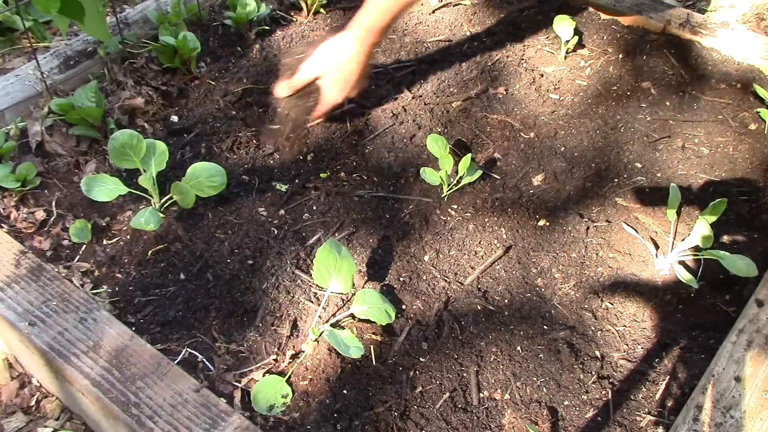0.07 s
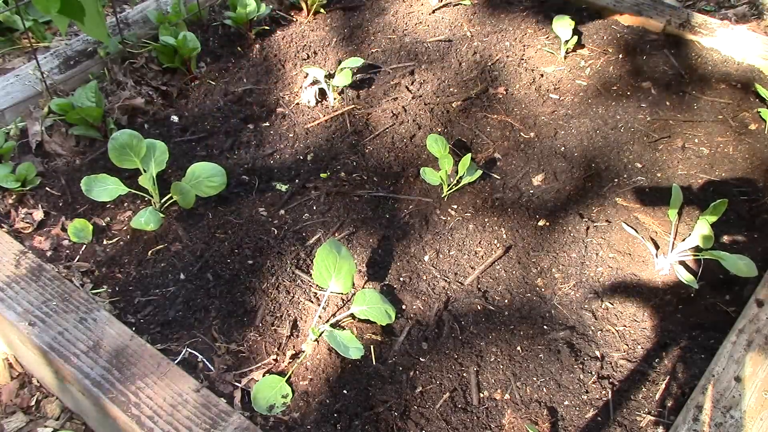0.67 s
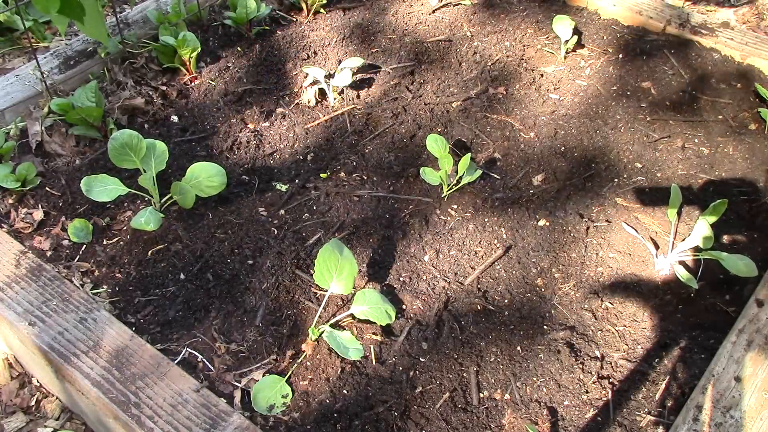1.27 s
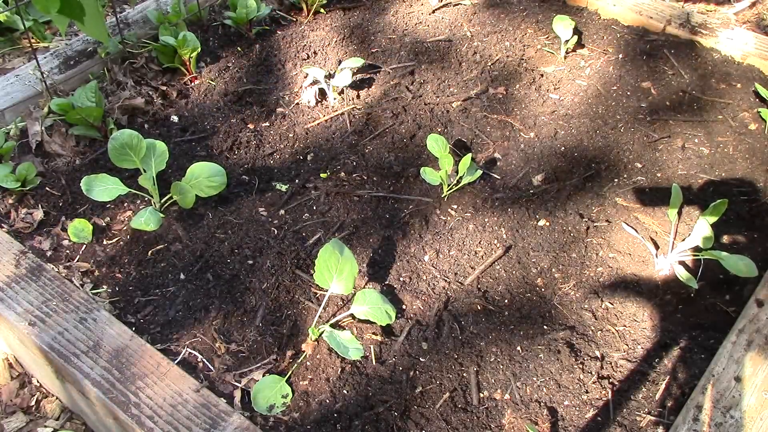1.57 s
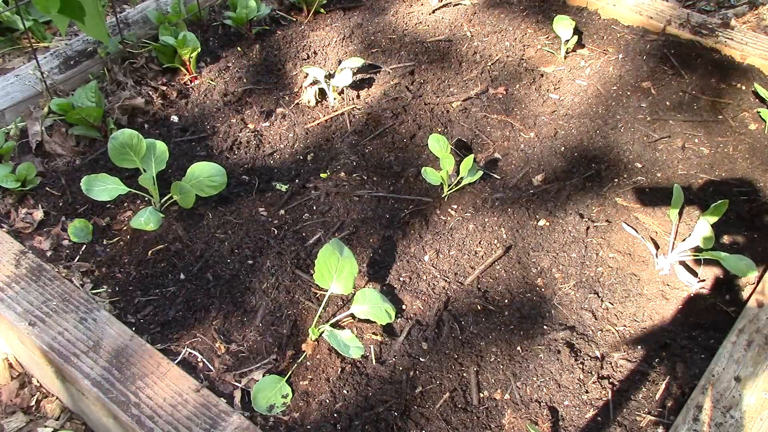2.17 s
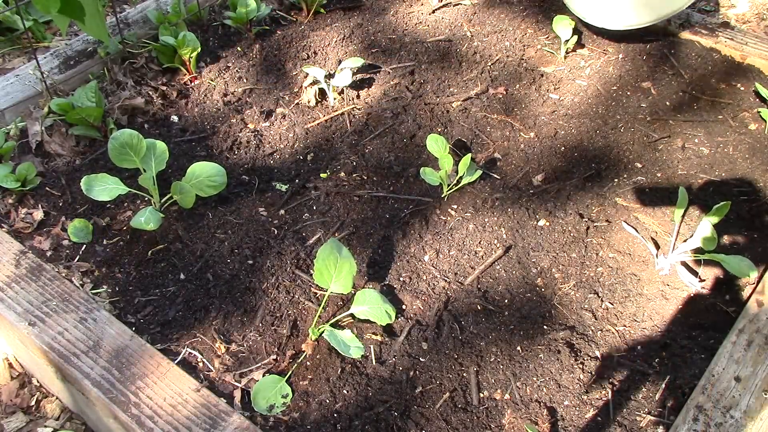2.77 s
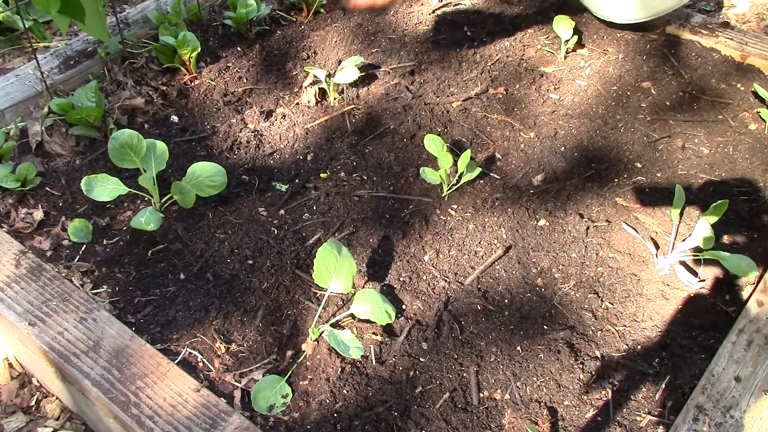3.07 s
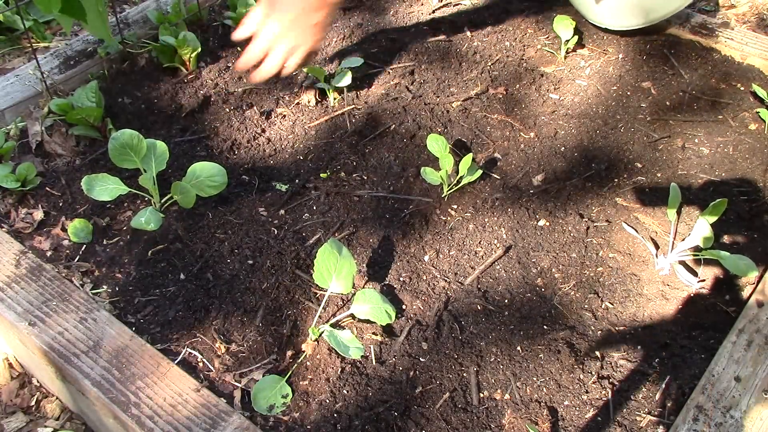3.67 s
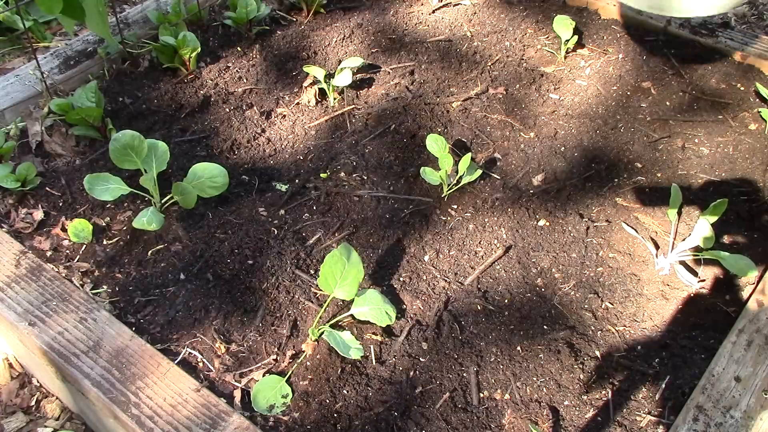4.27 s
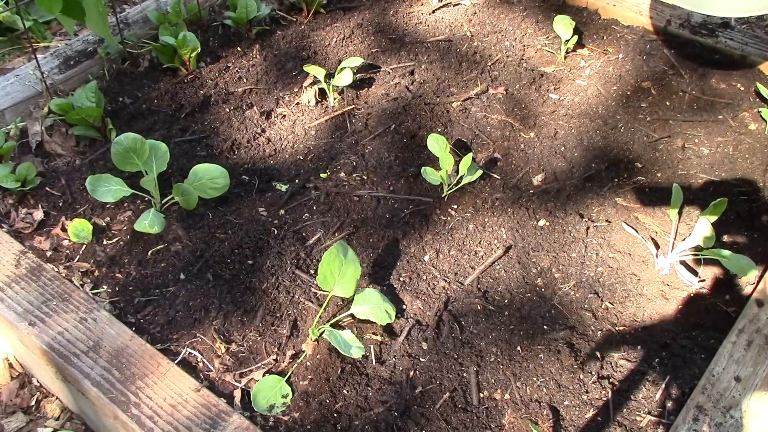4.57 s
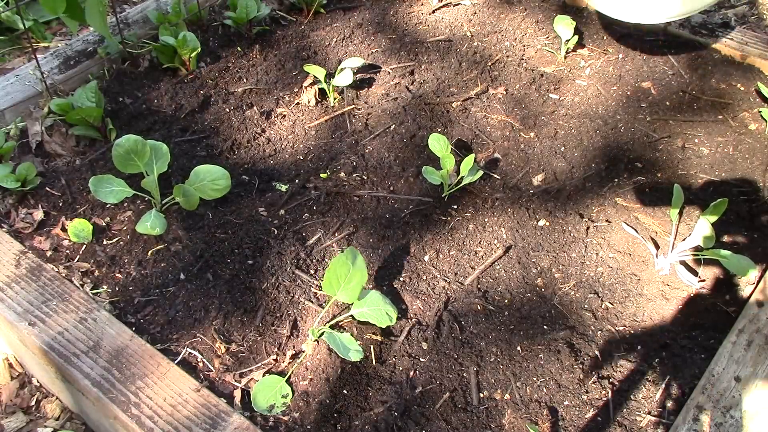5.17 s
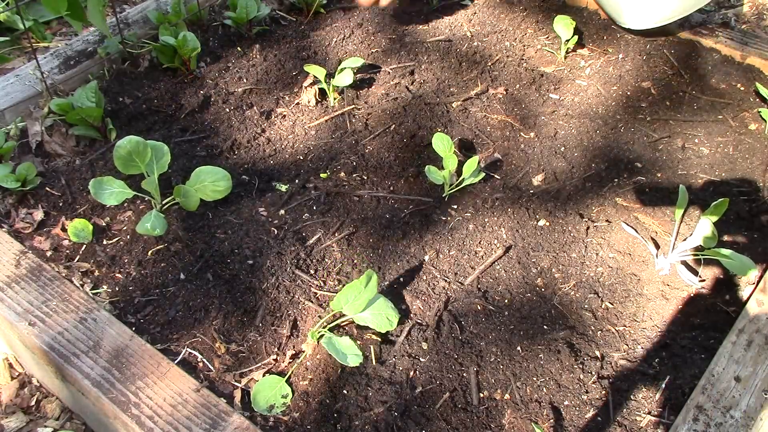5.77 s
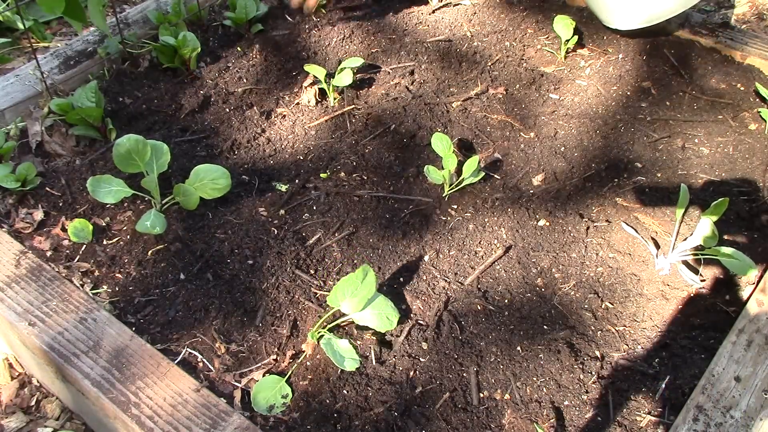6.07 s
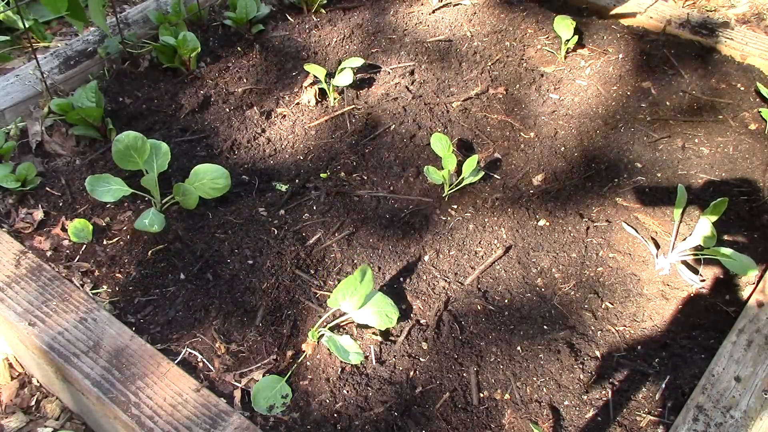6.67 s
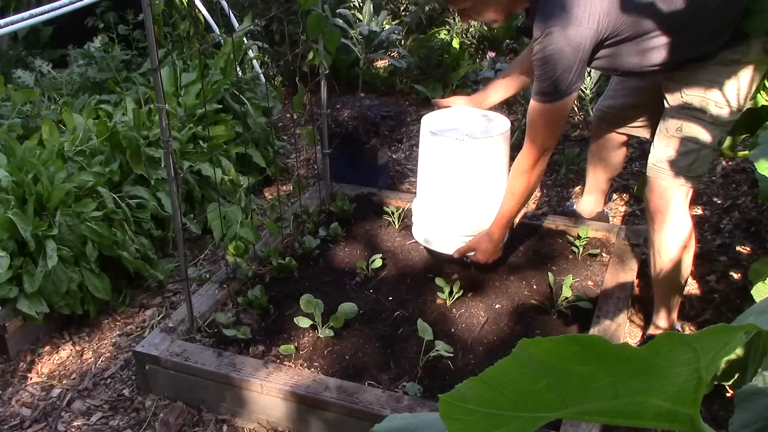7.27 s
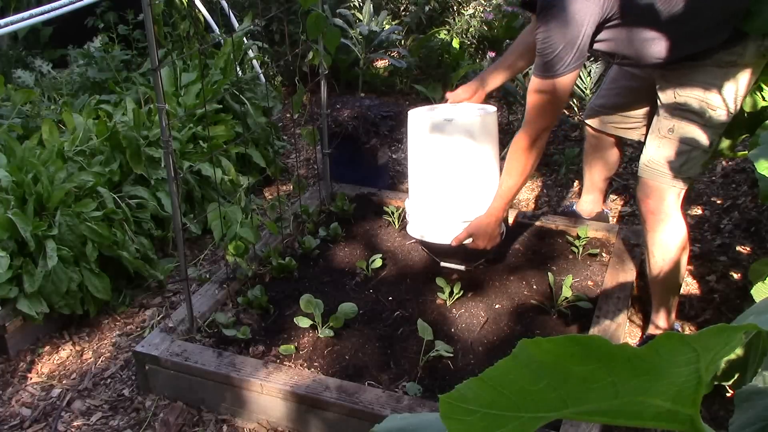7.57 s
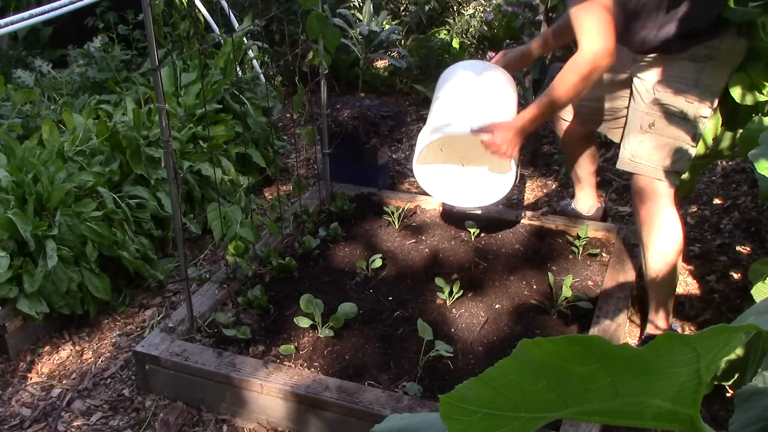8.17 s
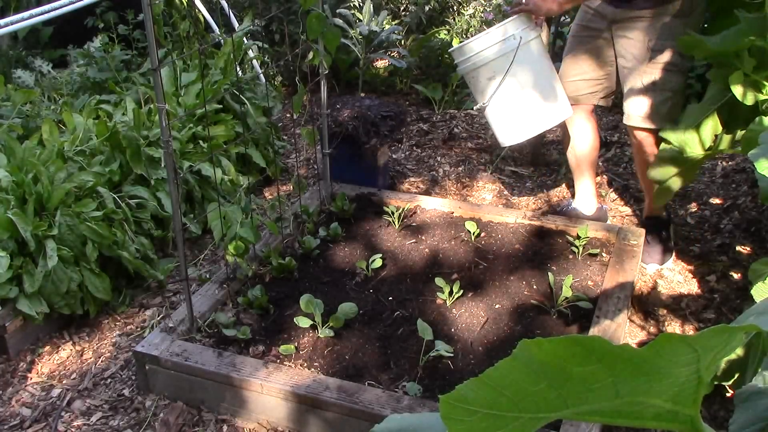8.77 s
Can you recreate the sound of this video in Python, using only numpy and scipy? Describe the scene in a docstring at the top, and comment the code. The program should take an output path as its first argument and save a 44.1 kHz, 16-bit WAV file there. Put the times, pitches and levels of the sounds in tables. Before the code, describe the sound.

Compost scraped from a plastic bucket by hand, with hollow knocks and a distant engine, then three booming slaps and a clattering wire handle.

```python
"""A distant engine hums, changes gear and fades while a hand digs compost from a plastic bucket, knocking
its wall into resonance. Crumbs scrape and hiss, twigs snap, and handfuls patter on a garden bed. From about
2.5 s, soft rubs, bumps and puffs of air reach the microphone. At 7.4 s the upturned bucket takes the first
of three booming slaps; then it is carried off, its wire handle clattering on the rim."""
import sys
import numpy as np
from scipy import signal
from scipy.fft import rfft, irfft, next_fast_len
from scipy.io import wavfile

SR = 44100
rng = np.random.default_rng(int(sys.argv[2]) if len(sys.argv) > 2 else 0)


def bounce(signal):
    """Save signal as a 16-bit WAV file at the path given by the first command-line argument."""
    frames = np.transpose(np.atleast_2d(signal))
    limited = np.clip(frames, -1, 1)
    pcm = np.round(limited * 32767).astype(np.int16)
    wavfile.write(sys.argv[1], SR, pcm)


N = 398223

# modes of the bucket's hollow and of its wire handle: (frequency [Hz], relative level [dB], t60 [s])
HOLLOW_MODES = [(127.2, -35, 0.8), (235, -36.5, 1), (784.8, -19, 0.37), (980, -28, 0.19), (1310, -28, 0.41),
                (1712, -46, 0.28), (2340, -37, 0.43)]
WIRE_MODES = [(2810, -43, 0.3), (3065, -23, 0.36), (3170, -20.5, 0.26)]
# body and bright top of a twig or grit snap: (frequency [Hz], relative level [dB])
SNAP_BODY_SPECTRUM = [(300, -32), (900, 1.5), (1600, 9), (3000, 11), (4000, 6), (5300, 6), (7000, 0.5),
                      (16000, -9)]
SNAP_TOP_SPECTRUM = [(2500, -56), (5300, 12), (7000, 3), (8700, 5), (12000, 1.5), (16000, -12)]


def scuffs(loaded_db=-7, emptied_s=6.2, thud_db=-21.5, thud_per_dull=1.66, crack_db=-11):
    """The digging hand knocks on the wall; compost damps the ring until the bucket is nearly empty."""
    # (time [s], level [dB], dullness: wall tone relative to the level [dB], t60 [s], drag [s])
    touches = [(0.836, -22.5, -1.5, .25, 0.002), (0.854, -23.5, -3.5, 0.21, 0.0099),
               (0.874, -32.5, 9, 0.092, 0.0049), (0.923, -40, 15, .1, 0.0007), (1.143, -22, -2, 0.26, .007),
               (1.309, -23.5, 6, 0.25, 0.0062), (1.341, -31, 4, 0.18, .004),
               (1.42, -24.5, -3, 0.092, 0.00082), (1.483, -14, -8, 0.053, 0.00077),
               (1.5, -9, -9, 0.18, .005), (1.516, -20, 3, 0.094, 0.0014), (1.53, -23, 1.5, 0.06, 0.0013),
               (1.603, -27, -2.5, 0.026, 0.00052), (1.677, -31.5, -6, 0.035, .001),
               (1.706, -32.5, 4.5, .08, 0.00054), (1.769, -25, -4.5, 0.032, .0006),
               (1.82, -17, -5.5, .07, .007), (1.829, -12.5, -7, 0.082, 0.0029),
               (1.841, -14.5, 0.5, 0.2, 0.0023), (1.865, -24.5, 5.5, 0.066, .004),
               (1.907, -20, 6, .1, 0.0016), (1.949, -21.5, 2.5, 0.047, 0.0013),
               (2.025, -32, 8.5, .18, .001), (2.43, -36, 0.5, 0.15, 0.00063),
               (2.589, -26, -5.5, 0.032, 0.0024), (4.235, -33.5, -5, 0.1, 0.0008),
               (4.365, -23, -8.5, 0.16, .001), (4.387, -20, -12, .07, 0.0017),
               (4.399, -20, -10, 0.031, 0.00047), (4.432, -14.5, -9, 0.022, .0025),
               (5.018, -34.5, -1.5, .2, .001), (6.494, -22, -6.5, 0.22, 0.0045),
               (6.512, -21, -7, 0.092, 0.0038), (6.647, -32, -6.5, 0.1, 0.00071),
               (7.088, -45, 6.5, 0.065, .004)]
    hits = [(s, db, thud_db + thud_per_dull * dull, dull, crack_db, t60, drag_s)
            for s, db, dull, t60, drag_s in touches]
    damped = [(s, db + loaded_db * (s < emptied_s)) for s, db, *_ in touches]
    wall = knocks(hits, chatter_db=-3.5)
    return wall + ringing(damped, HOLLOW_MODES, ring_db=0.5) + ringing(damped, WIRE_MODES, ring_db=3)


def slaps(wall_db=-5, crack_db=-4, t60=0.1, drag_s=0.0027):
    """A flat hand on the upturned bucket: the bottom booms like a drum under the thud and crack."""
    # (time [s], level [dB], relative thud [dB], relative boom [dB])
    blows = [(7.36, -13, -8, -7.5), (7.623, -13.5, -5.5, -0.5), (7.912, -16.5, -1, -1.5)]
    # the drumming bottom: (frequency [Hz], relative level [dB], t60 [s])
    bottom_modes = [(121, -27, 0.32), (222, -5, 0.23), (292, -17, 0.42), (371, -4, 0.074)]
    hits = [(s, db, thud_db, wall_db, crack_db, t60, drag_s) for s, db, thud_db, _ in blows]
    boom = ringing([(s, db + boom_db) for s, db, _, boom_db in blows], bottom_modes, ring_db=-6)
    rings = ringing(hits, HOLLOW_MODES, ring_db=-3) + ringing(hits, WIRE_MODES, ring_db=-2.5)
    return knocks(hits, chatter_db=-2.5) + boom + rings + ticks(hits, tick_db=-10, t60=0.072)


def clatter(thud_db=-22, wall_db=-7, t60=0.16):
    """The wire handle falls against the empty bucket's rim: light, bright and ringing."""
    # (time [s], level [dB], relative crack [dB], drag [s])
    rim_taps = [(7.399, -30, -11, .001), (7.42, -36, -14, 0.0049), (7.585, -41.5, -14, 0.00093),
                (7.638, -25.5, -12, 0.0012), (7.68, -36, -12, 0.0057), (8.009, -44, -12, 0.0097),
                (8.111, -48.5, -13, 0.0052), (8.268, -30, -14, 0.0036), (8.316, -31, -9.5, 0.0013),
                (8.338, -36, -14, .001), (8.65, -17, -3, 0.0056), (8.669, -18, -7, 0.0032),
                (8.9, -37, -8, 0.0049)]
    hits = [(s, db, thud_db, wall_db, crack_db, t60, drag_s) for s, db, crack_db, drag_s in rim_taps]
    cracks = [(s, db + crack_db) for s, db, crack_db, _ in rim_taps]
    rings = ringing(hits, HOLLOW_MODES, ring_db=3.5) + ringing(hits, WIRE_MODES, ring_db=1.5)
    return knocks(hits, chatter_db=-2) + rings + ticks(cracks, tick_db=-3, t60=0.037)


def handle_ping(s=8.714, hz=5800, db=-31, t60=0.066):
    """The wire handle rings briefly as it swings free."""
    out, t = np.zeros(N), np.arange(SR // 4) / SR
    add(out, s, np.sin(2 * np.pi * hz * t) * from_db(db - 60 * t / t60))
    return out


def knocks(hits, chatter_db, crack_t60=0.023, size=7000):
    """Each contact with the bucket drags, peaks and dies in a chatter, balanced in four bands."""
    # tone of the contact force: (frequency [Hz], relative level [dB])
    contact_spectrum = [(100, -15), (400, -2), (1500, 4.5), (3300, 5.5), (4200, -3), (6000, -7),
                        (8000, -10), (12000, -18.5), (16000, -44)]
    out, t = np.zeros(N), np.arange(size) / SR
    attack = SR // 100   # the first 10 ms set each band's level
    bands_hz = [(150, 650), (650, 1200), (1200, 3600), (3600, 15800)]
    for s, db, thud_db, wall_db, crack_db, t60, drag_s in hits:
        pressing = np.sqrt(np.minimum(t / max(drag_s, 1 / SR), 1))
        since_peak = np.maximum(t - drag_s, 0)
        decay = from_db(-60 * since_peak / crack_t60) + from_db(chatter_db - 60 * since_peak / t60)
        force = rng.standard_normal(size) * pressing * decay
        shell = bucket(colour(force, contact_spectrum), direct=0.2)
        for edges_hz, share_db in zip(bands_hz, (thud_db, wall_db, 0, crack_db)):
            part = band(shell, *edges_hz, order=3)
            add(out, s, part * from_db(db + share_db) / np.std(part[:attack]))
    return out


def bucket(x, direct, flex=0.024, touch_db=3.0):
    """The plastic shell resonates beside the direct sound; each grip shifts its tuning and balance."""
    # (frequency [Hz], width [Hz], gain [dB])
    shell_modes = [(214, 67, 2), (323, 11, -16), (474.5, 39, 7.5), (695, 34, -10.5), (938, 63, 4.5),
                   (1050, 13, 0), (1264, 18, -1.5), (1479, 126, -1.5), (1670, 176, -0.5), (2173, 300, -2),
                   (2366, 16, -4.5), (2665, 350, -5), (3056, 47, -6.5), (3310, 52, -15), (4450, 87, -5),
                   (4420, 290, -14), (5420, 220, -7), (6860, 320, -16)]
    out = direct * x
    for hz, width_hz, db in shell_modes:
        bend, touch = rng.standard_normal(2)
        out = out + from_db(db + touch_db * touch) * resonance(x, hz * (1 + flex * bend), width_hz)
    return out


def ringing(hits, modes, ring_db, touch_db=2):
    """Hits (time [s], level [dB], ...) set modes ringing, in a slightly different balance each time."""
    out, t = np.zeros(N), np.arange(SR // 2) / SR
    hz, mode_db, t60 = np.transpose(modes)[:, :, None]
    rings = np.sin(2 * np.pi * hz * t) * from_db(mode_db - 60 * t / t60)
    rings = band(rings, 0.85 * hz.min(), 2 * hz.max(), order=3)
    for s, db, *_ in hits:
        mode_gains = from_db(db + ring_db + touch_db * rng.standard_normal(len(modes)))
        add(out, s, mode_gains @ rings)
    return out


def ticks(hits, tick_db, t60, size=2048):
    """A burst of treble noise puts a bright edge on hard hits (time [s], level [dB], ...)."""
    out, t = np.zeros(N), np.arange(size) / SR
    for s, db, *_ in hits:
        burst = rng.standard_normal(size) * from_db(-60 * t / t60)
        add(out, s, from_db(db + tick_db) * band(burst, 7000, 15000))
    return out


def compost(scrape_db=-2, hiss_db=-2, grit_db=-12, sand_db=-13, clump_db=2.36):
    """Coarse crumbs drag on the bucket wall, fine ones hiss as they slide, grit ticks; all in clumps."""
    # strokes through the compost: (start [s], length [s], scrape level [dB], hiss level [dB])
    strokes = [(0.928, 0.17, -43.5, -47), (1.236, .12, -38.5, -43.5), (1.365, 0.032, -30, -36.5),
               (1.66, 0.26, -41, -49.5), (1.926, 0.12, -39, -41), (2.135, 0.09, -45, -50),
               (2.563, 0.093, -43.5, -46), (3.06, 0.42, -69, -61), (4.172, 0.043, -43.5, -48),
               (4.35, 0.51, -47, -46), (4.827, 0.14, -42, -44), (5.345, 0.075, -44, -49.5),
               (6.458, .1, -40.5, -55), (6.624, 0.14, -51.5, -52), (8.542, .22, -46, -52)]
    # tone of coarse and of fine crumbs: (frequency [Hz], relative level [dB])
    scrape_spectrum = [(200, -19.5), (500, 3), (900, 9), (3000, 9), (4200, -3), (6000, 1), (9000, -21),
                       (16000, -21)]
    hiss_spectrum = [(600, -8), (2000, 0.5), (4000, 8.5), (6500, 6), (10000, 2.5), (13000, 1), (16000, -12)]
    scrape = stroke_envelope([(s, length_s, db) for s, length_s, db, _ in strokes])
    slide = stroke_envelope([(s, length_s, db) for s, length_s, _, db in strokes])
    dragging = grains(scrape_spectrum, per_s=5000, spread_db=1.5)
    coarse = from_db(scrape_db) * rms_one(bucket(dragging, direct=1.2))
    fine = from_db(hiss_db) * grains(hiss_spectrum, per_s=17000, spread_db=0)
    grit = from_db(grit_db) * grains(SNAP_BODY_SPECTRUM, per_s=98, spread_db=8.5)
    sand = from_db(sand_db) * grains(SNAP_TOP_SPECTRUM, per_s=180, spread_db=6.5)
    return (scrape * (coarse + grit) + slide * (fine + sand)) * from_db(clump_db * drift(70))


def stroke_envelope(strokes, attack_s=0.1, t60=0.67, settle_db=-10.5, settle_t60=6.2):
    """A stroke swells and stops; a few crumbs slide on."""
    return swells(strokes, attack_s, t60) + from_db(settle_db) * swells(strokes, attack_s, settle_t60)


def snaps(crack_t60=0.016, tail_t60=0.073, tail_db=-13, ring_db=4, size=4410):
    """Dry twigs and grit break with a bright tick and a short tail, each with a ring of its own."""
    # (time [s], body level [dB], top level [dB])
    breaks = [(1.389, -17, -42), (1.405, -21.5, -28), (1.944, -27, -32), (2.589, -22.5, -26),
              (2.643, -30, -37), (2.677, -25, -33.5), (2.737, -34, -46), (2.776, -38, -46),
              (2.814, -24, -23.5), (3.047, -36.5, -36), (3.09, -38, -52), (3.131, -45, -42),
              (4.873, -32, -34), (5.324, -34, -36.5), (5.362, -31, -34), (5.397, -27, -33),
              (5.427, -29.5, -53), (5.466, -35, -42), (5.643, -40, -42), (6.62, -37, -47),
              (6.864, -38, -49)]
    out, t = np.zeros(N), np.arange(size) / SR
    attack = SR // 200   # the first 5 ms set the level
    decay = from_db(-60 * t / crack_t60) + from_db(tail_db - 60 * t / tail_t60)
    for (s, body_db, top_db), whites in zip(breaks, rng.standard_normal((len(breaks), 2, size))):
        layers = [(SNAP_BODY_SPECTRUM, body_db, 2400), (SNAP_TOP_SPECTRUM, top_db, 7500)]
        for (spectrum, db, centre_hz), white in zip(layers, whites):
            tick = colour(white * decay, spectrum)
            ring_hz = centre_hz * 2 ** rng.uniform(-0.58, 0.64)
            tick = tick + from_db(ring_db) * resonance(tick, ring_hz, centre_hz / 20)
            add(out, s, tick * from_db(db) / np.std(tick[:attack]))
    return out


def scatter(patter_db=-1, clump_db=5, attack_s=0.14, straggler_db=-11.5):
    """Each thrown handful lands on the bed as a soft shower, with a few last crumbs trailing."""
    # (time when thickest [s], length [s], level [dB])
    handfuls = [(.19, 0.069, -58.5), (.45, 0.075, -56), (3.6, 0.013, -46.5), (6.08, 0.13, -65),
                (7.56, 0.046, -51.5)]
    # tone of the landing crumbs: (frequency [Hz], relative level [dB])
    patter_spectrum = [(1500, -9), (3000, 5.5), (6500, -1.5), (9500, 4), (12500, 0), (16000, -16)]
    shower = swells(handfuls, attack_s, t60=0.43)
    stragglers = from_db(straggler_db) * swells(handfuls, attack_s, t60=2)
    patter = grains(patter_spectrum, per_s=5400, spread_db=4)
    return (shower + stragglers) * patter * from_db(patter_db + clump_db * drift(70))


def handling(rub_db=-1, uneven_db=4.5):
    """Fingers creep on the microphone's case: dull little slips, and now and then a single bump."""
    # spells of rubbing: (start [s], length [s], level [dB])
    rubs = [(2.58, 0.029, -34), (2.76, 0.42, -39), (3.89, 0.031, -49), (4.14, .07, -39), (4.26, .25, -44),
            (4.67, 0.19, -49), (4.95, 0.035, -49), (5.19, .25, -45), (5.86, 0.13, -45.5),
            (6.13, .15, -48.5), (6.32, 0.33, -42.5), (6.73, 0.11, -32.5), (6.95, 0.096, -39.5),
            (7.12, 0.21, -47)]
    # tone of the slips: (frequency [Hz], relative level [dB])
    rub_spectrum = [(25, -35), (60, -17), (110, -5), (170, 1), (280, 1.5), (400, -6.5), (600, -18),
                    (1500, -49), (6000, -78)]
    # bumps on the case: (time [s], peak level [dB])
    bumps = [(2.618, -19.5), (2.737, -27), (2.853, -27), (2.915, -25.5), (2.933, -25), (3.068, -21),
             (4.183, -27), (4.837, -31), (5.2, -35), (5.377, -24.5), (5.594, -31), (6.335, -22.5),
             (6.577, -23), (6.726, -22.5), (6.919, -25.5), (7.041, -23.5)]
    slips = grains(rub_spectrum, per_s=700, spread_db=4)
    out = slips * swells(rubs, attack_s=0.032, t60=0.23) * from_db(rub_db + uneven_db * drift(30))
    bump = band(signal.unit_impulse(2048), 129, 347, order=3)
    for (s, db), sign in zip(bumps, rng.choice([-1, 1], len(bumps))):
        add(out, s, sign * from_db(db) * bump / np.abs(bump).max())
    return out


def breeze():
    """Puffs of air buffet the microphone ports."""
    # (start [s], length [s], level [dB])
    gusts = [(2.36, 0.19, -35), (5.35, 0.56, -78), (6.65, 0.2, -75), (8.98, .05, -55)]
    # bassy buffeting: (frequency [Hz], relative level [dB])
    buffet_spectrum = [(25, -20), (50, -9), (80, 7.5), (120, 9.5), (200, -4), (1000, -75)]
    return swells(gusts, attack_s=0.062, t60=0.45) * noise(buffet_spectrum)


def engine(rumble_db=-0.5, note_db=-5, waver_db=2.5, dip_at_s=1.66, dip_s=0.18, dip_db=-24):
    """A far vehicle pulls away, rumbling; its firing note fades briefly as it climbs after a gear change."""
    # firing rate, which drops at the gear change: (time [s], rate [Hz])
    firing_curve = [(0, 125.7), (.45, 128), (1.05, 152.5), (1.22, 150.8), (1.3, 105.4), (1.8, 116.4),
                    (2.5, 132.8)]
    # swell and fade of the engine: (time [s], level [dB])
    level_curve = [(0, -41), (.4, -40), (.8, -32), (1.15, -34.5), (2.3, -36), (2.6, -39), (3.1, -58),
                   (3.3, -65)]
    # exhaust rumble: (frequency [Hz], relative level [dB])
    rumble_spectrum = [(25, -60), (50, -24), (70, -14.5), (100, -1), (145, -1.5), (190, -6), (330, -9),
                       (480, -9.5), (700, -17), (1200, -23), (2500, -32.5), (8000, -66)]
    t = np.arange(N) / SR
    firing_hz = in_time(firing_curve) * (1 + 0.011 * drift(25))
    note_dip_db = dip_db * np.exp(-((t - dip_at_s) / dip_s) ** 2)
    note = np.sqrt(2) * np.sin(2 * np.pi * np.cumsum(firing_hz) / SR)
    rumble = from_db(rumble_db) * noise(rumble_spectrum)
    note_gain = from_db(note_db + note_dip_db + waver_db * drift(14))
    return from_db(in_time(level_curve)) * (rumble + note_gain * note)


def outdoors():
    """A quiet bed of garden air, with the distant engine in it."""
    # background hiss, dipping as the recorder's gain ducks after the slaps: (time [s], level [dB])
    floor_curve = [(0, -47.5), (3.5, -52), (6.5, -49), (7.4, -49.5), (7.85, -57), (8.3, -50.5),
                   (9.0, -51.5)]
    # tone of the air: (frequency [Hz], relative level [dB])
    air_spectrum = [(25, -46), (60, -44), (120, -0.5), (200, -4), (350, 2), (600, -3), (1000, -4),
                    (2000, -11), (4000, -12), (8000, -21.5), (16000, -36)]
    return from_db(in_time(floor_curve)) * noise(air_spectrum) + engine()


def garden_echo(x, wet_db=-21, t60=0.17, gap_s=0.0062):
    """Beds, fence and foliage scatter a faint, dull tail."""
    t = np.arange(SR // 2) / SR
    tail = band(rng.standard_normal(len(t)), 300, 2500, order=1) * from_db(-60 * t / t60) * (t > gap_s)
    return from_db(wet_db) * signal.oaconvolve(x, tail / np.linalg.norm(tail))[:N]


def port_difference(x):
    """The path difference between the ports gives a side signal a quarter cycle off, mostly treble."""
    # width of the close sounds: (frequency [Hz], side relative to mid [dB])
    near_width = [(500, -62), (1200, -40), (3000, -27), (4500, -21), (8000, -11), (16000, -18.5)]
    size = next_fast_len(N)
    hz = np.maximum(np.fft.rfftfreq(size, 1 / SR), 1)
    return irfft(1j * from_db(at_hz(near_width, hz)) * rfft(x, size), size)[:N]


def grains(spectrum, per_s, spread_db):
    """Random coloured clicks at unit rms; more spread makes a few large ones stand out of the small."""
    chance, luck = rng.random((2, N))
    born = chance < per_s / SR
    sizes = np.minimum(-np.log(np.abs(2 * luck[born] - 1) + 1e-9), 4)
    clicks = np.zeros(N)
    clicks[born] = np.sign(luck[born] - 0.5) * from_db(spread_db * sizes)
    return rms_one(colour(clicks, spectrum))


def swells(rows, attack_s, t60):
    """Envelope of rows (start [s], length [s], level [dB]): each gathers, holds and dies; loudest wins."""
    envelope = np.zeros(N)
    for start_s, length_s, db in rows:
        t = np.arange(N) / SR - start_s
        rise = np.clip(1 + t / attack_s, 0, 1) ** 2
        fall = from_db(-60 * np.clip((t - length_s) / t60, 0, 3))
        envelope = np.maximum(envelope, from_db(db) * rise * fall)
    return envelope


def noise(spectrum):
    """Coloured noise at unit rms."""
    return rms_one(colour(rng.standard_normal(N), spectrum))


def drift(per_s):
    """A random wander at unit rms."""
    knots = rng.standard_normal(4096)
    return rms_one(np.interp(np.arange(N) * (per_s / SR), np.arange(len(knots)), knots))


def colour(x, spectrum, size=4096):
    """Minimum-phase EQ with the given spectrum."""
    hz = np.maximum(np.fft.rfftfreq(size, 1 / SR), 1)
    cepstrum = irfft(np.log(from_db(at_hz(spectrum, hz))))[:size // 2]
    cepstrum[1:] *= 2
    impulse = irfft(np.exp(rfft(cepstrum, size)))
    return signal.oaconvolve(x, impulse)[:len(x)]


def resonance(x, hz, width_hz):
    """Two-pole resonance with unit gain at its peak."""
    r = np.exp(-np.pi * width_hz / SR)
    feedback = [1, -2 * r * np.cos(2 * np.pi * hz / SR), r * r]
    return signal.lfilter(np.array([1, 0, -1]) * (1 - r * r) / 2, feedback, x + 1e-18)


def band(x, low_hz, high_hz, order=2):
    """Band-pass filter."""
    return signal.sosfilt(signal.butter(order, [low_hz, high_hz], "band", fs=SR, output="sos"), x)


def in_time(curve):
    """Read a curve (time [s], value) at every sample."""
    return np.interp(np.arange(N) / SR, *np.transpose(curve))


def at_hz(spectrum, hz):
    """Read a spectrum on a log-frequency axis."""
    points_hz, db = np.transpose(spectrum)
    return np.interp(np.log(hz), np.log(points_hz), db)


def add(track, s, sound):
    """Mix a sound in at a time."""
    at = round(s * SR)
    track[at:at + len(sound)] += sound[:max(N - at, 0)]


def from_db(db):
    """Decibels to gain."""
    return 10 ** (np.asarray(db) / 20)


def rms_one(x):
    """Scale to unit rms."""
    return x / np.sqrt(np.mean(x ** 2) + 1e-20)


def scene(breeze_side_db=-3, handling_side_db=-16):
    """A narrow mid/side image: two close ports differ in treble, ambience, breeze and handling."""
    # width of the ambience: (frequency [Hz], side relative to mid [dB])
    air_width = [(40, -15), (100, -29), (300, -23), (1000, -26.5), (2500, -16.5), (6000, -10), (16000, -7)]
    near = scuffs() + slaps() + clatter() + snaps() + compost() + scatter() + handle_ping()
    near = near + garden_echo(near)
    mid = near + outdoors() + breeze() + handling()
    side = port_difference(near) + colour(outdoors(), air_width)
    side += from_db(breeze_side_db) * breeze() + from_db(handling_side_db) * handling()
    return np.array([mid + side, mid - side])


def record(dry, ceiling=1.3, cutoff_hz=16000):
    """Soft saturation rounds the highest peaks and a steep low-pass cuts the top."""
    low_pass = signal.ellip(12, 0.1, 90, cutoff_hz, fs=SR, output="sos")
    return signal.sosfilt(low_pass, ceiling * np.tanh(dry / ceiling))


dry = scene()
out = record(dry)
bounce(out)
```